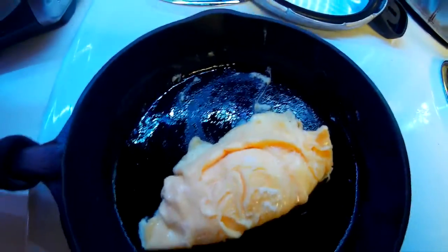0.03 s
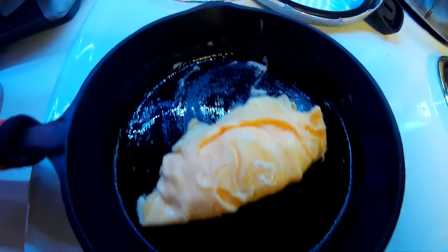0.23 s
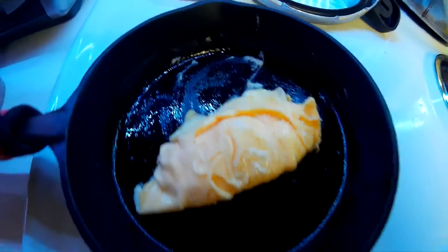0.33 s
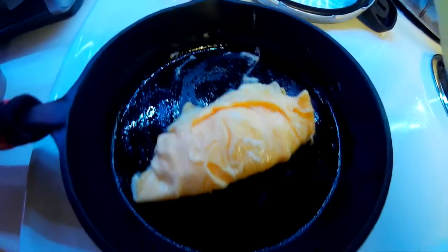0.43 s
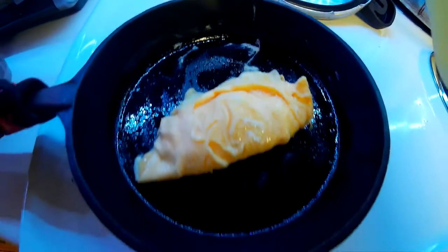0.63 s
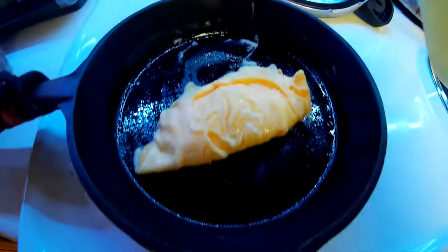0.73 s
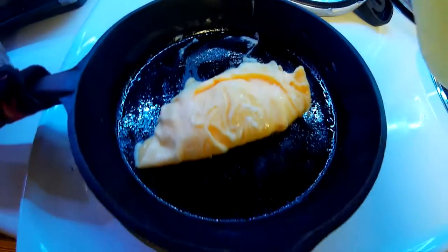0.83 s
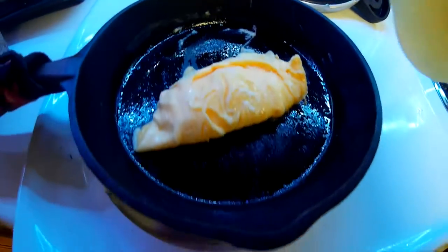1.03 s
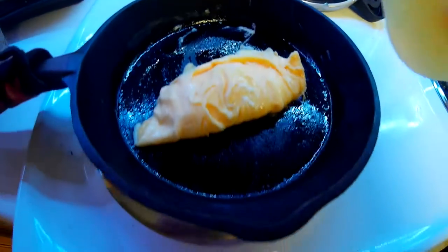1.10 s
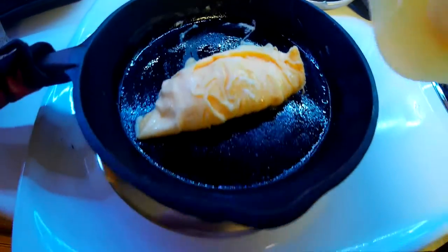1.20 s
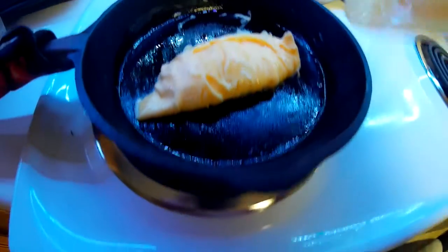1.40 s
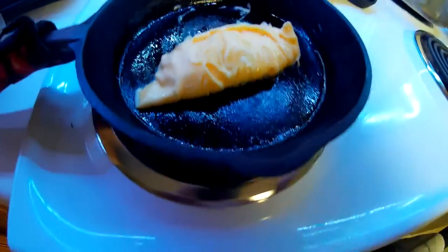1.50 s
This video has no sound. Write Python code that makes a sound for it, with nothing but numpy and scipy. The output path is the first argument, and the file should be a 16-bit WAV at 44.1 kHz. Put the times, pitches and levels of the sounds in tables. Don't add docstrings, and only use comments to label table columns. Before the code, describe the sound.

A cast iron pan shoved on a metal stove top: quiet hiss of hot fat, low hum and faint fan whine first, then from 0.17 s a creep swells into a dull, boomy, juddering thump with gritty scrape, strongest at 0.24-0.33 s with a sharp spit, fading by 0.56 s. Tiny crackles near 0.7 s, a faint brush around 0.85 s, then steady sizzle to 1.5 s.

```python
import sys
import numpy as np
from scipy import signal
from scipy.fft import rfft, irfft
from scipy.io import wavfile
from scipy.ndimage import uniform_filter1d

SR = 44100
rng = np.random.default_rng(int(sys.argv[2]) if len(sys.argv) > 2 else 0)


def waveform_to_disk(signal):
    frames = np.transpose(np.atleast_2d(signal))
    scaled = np.clip(frames, -1, 1) * 32767
    samples = np.round(scaled).astype(np.int16)
    wavfile.write(sys.argv[1], SR, samples)


def linear_from_db(decibels):
    return 10 ** (np.asarray(decibels, float) / 20)


N = 68355

# t/s, load on the burner level/dB, sliding speed level/dB, treble bite of the contact level/dB
SHOVE_MOTION = [
    (.165, -58, -74, -24),
    (.19, -47.5, -61, -7.5),
    (.232, -36, -51.5, -20),
    (.243, -31.5, -50.5, -5),
    (.275, -32.5, -43, -0.5),
    (.33, -33.5, -46, -2.5),
    (.43, -44.5, -47, -2.5),
    (.5, -49.5, -51, -8.5),
    (.56, -64, -69.5, 2),
]


def evened(x):
    return x / np.sqrt(np.mean(x ** 2) + 1e-20)


def along(table, column=1):
    rows = np.array(table)
    level_db = np.interp(np.arange(N) / SR, rows[:, 0], rows[:, column], -120, -120)
    return linear_from_db(level_db)


def resonate(x, hz, width):
    turn = np.exp(2j * np.pi * hz * np.arange(len(x)) / SR)
    r = np.exp(-np.pi * width / SR)
    return 2 * (turn * signal.lfilter([1 - r], [1, -r], x / turn)).real


def resonate_twice(x, hz, width):
    return resonate(resonate(x, hz, width), hz, width)


def band(x, low_hz, high_hz, order=2):
    return signal.sosfilt(signal.butter(order, [low_hz, high_hz], "bandpass", fs=SR, output="sos"), x)


def coloured(x, points):
    hz = np.fft.rfftfreq(len(x), 1 / SR)
    f, db = np.transpose(points)
    gain_db = np.interp(np.log(hz + 1), np.log(f + 1), db, -90)
    return irfft(rfft(x) * linear_from_db(gain_db), len(x))


def grains(per_s, spread_db):
    struck = rng.random(N) < per_s / SR
    size = linear_from_db(spread_db * np.minimum(rng.exponential(1, N), 4))
    return evened(struck * size * np.sign(rng.standard_normal(N)))


def patchy(depth_db, wide, long):
    z = signal.stft(rng.standard_normal(N + 512), nperseg=512, noverlap=384)[2]
    drift = uniform_filter1d(rng.standard_normal(z.shape), wide, axis=0)
    drift = uniform_filter1d(drift, long, axis=1)
    return signal.istft(z * linear_from_db(depth_db * evened(drift)), nperseg=512, noverlap=384)[1][:N]


def kitchen_hum():
    # f/Hz, spectrum level/dB
    hum_spectrum = [(16, -14), (28, 0), (46, -2), (70, -7), (150, -10), (280, -11), (600, -21), (2500, -62)]
    hum = linear_from_db(-53.5) * evened(coloured(patchy(0.23, wide=3, long=20), hum_spectrum))
    boom = linear_from_db(-64) * evened(resonate_twice(rng.standard_normal(N), hz=248, width=37))
    return hum + boom


def fan_whine():
    # f/Hz, bandwidth/Hz, level/dB
    fan_modes = [
        (2155, 220, -71.5),
        (2910, 450, -72),
    ]
    white = rng.standard_normal(N)
    return sum(linear_from_db(db) * evened(resonate_twice(white, hz, width)) for hz, width, db in fan_modes)


def fat_hiss():
    # f/Hz, spectrum level/dB
    hiss_spectrum = [(410, -46), (700, -5), (1190, -6), (2160, -5), (2560, -6), (3930, -7), (6270, -2),
                     (9130, -14), (15500, -21.5)]
    # t/s, level/dB
    simmer = [(0, .8), (.12, -1), (.55, -1.5), (.69, 1), (.75, -.5), (.85, .3), (1.0, -.7), (1.08, 1.2),
              (1.2, 0), (1.34, 1), (1.42, -.5), (1.55, -1)]
    fizz = patchy(1.0, wide=12, long=10) + linear_from_db(-9) * grains(1500, 3.0)
    return linear_from_db(-58.5) * evened(coloured(fizz, hiss_spectrum)) * along(simmer)


def spits():
    # t/s, peak level/dB
    spit_bursts = [
        (.018, -50),
        (.2618, -31),
        (.6675, -50),
        (.6915, -50),
        (.6928, -48),
        (.6942, -50),
        (.709, -48),
        (1.365, -54),
    ]
    clicks = np.zeros(N)
    for s, db in spit_bursts:
        clicks[round(s * SR)] = linear_from_db(db + 0.4)
    edge = band(clicks, 3500, 12300, order=10)
    ring = resonate_twice(edge, hz=6200, width=900)
    return clicks.max() * (ring / abs(ring).max() + linear_from_db(-1.5) * edge / abs(edge).max())


def flecks():
    # t/s, lower f/Hz, upper f/Hz, level/dB
    fleck_puffs = [
        (.138, 4200, 5700, -65),
        (.556, 6300, 9400, -67),
        (1.044, 5600, 6900, -62),
        (1.09, 5600, 6900, -63),
        (1.438, 5600, 6900, -65),
    ]
    fleck_s = .046
    t, out = np.arange(N) / SR, np.zeros(N)
    for s, low_hz, high_hz, db in fleck_puffs:
        puff = np.cos(np.pi * np.clip((t - s) / fleck_s, -.5, .5)) ** 2
        out += linear_from_db(db) * puff * evened(band(rng.standard_normal(N), low_hz, high_hz, order=8))
    return out


def panel(force):
    # f/Hz, bandwidth/Hz, level/dB
    panel_modes = [(117, 65, -11), (202, 22, -18), (238.5, 62, 4.5), (279, 20.5, -4), (318, 35, -10),
                   (411.8, 29, 0), (546, 58, -14.5), (627, 43, -13.5), (727, 110, -8.5), (850, 69, -16.5),
                   (1054, 33, -14.5), (1365, 21, -9.5), (1506, 32, -11), (1800, 36, -54)]
    return sum(linear_from_db(db) * resonate(force, hz, width) for hz, width, db in panel_modes)


def judder():
    slips = band(grains(per_s=2500, spread_db=1.5), 41, 1574, order=4)
    dull = signal.sosfiltfilt(signal.butter(2, 500, fs=SR, output="sos"), slips)
    bite = along(SHOVE_MOTION, column=3)
    force = (dull + (slips - dull) * bite) * along(SHOVE_MOTION)
    return linear_from_db(1) * panel(force) / np.std(panel(slips))


def heave():
    # t/s, level/dB
    frame_push = [
        (.17, -62),
        (.195, -47),
        (.232, -48),
        (.25, -41),
        (.32, -43),
        (.42, -55),
        (.51, -53),
        (.57, -62),
    ]
    low = band(rng.standard_normal(N), 29, 100)
    return linear_from_db(1.5) * evened(low) * along(frame_push)


def jolts():
    # t/s, force level/dB, contact time/ms
    catches = [(.2442, -23, 1.7), (.2485, -27, 1.7), (.2578, -23, 1.8), (.2655, -23, 1.5),
               (.2733, -20, 1.8), (.2772, -25, 1.4), (.2892, -30, 1.5), (.305, -25, 1.5), (.318, -24, 1.7),
               (.33, -28, 1.7), (.397, -33, 1.8), (.461, -33, 1.8)]
    t, force = np.arange(N) / SR, np.zeros(N)
    for s, db, ms in catches:
        force -= linear_from_db(db) * np.exp(-.5 * ((t - s) / (ms / 4000)) ** 2)
    force = signal.sosfiltfilt(signal.butter(2, 110, "highpass", fs=SR, output="sos"), force)
    return linear_from_db(5.5) * panel(force) + linear_from_db(-17) * force


def scrape():
    # f/Hz, spectrum level/dB
    rasp_spectrum = [(900, -40), (1600, -11), (2200, -6), (3500, -10), (4800, -8.5), (6300, -5.5),
                     (8000, -14.5), (11000, -23.5), (13000, -38)]
    grit = evened(coloured(grains(per_s=23000, spread_db=2), rasp_spectrum))
    return linear_from_db(-0.86) * grit * along(SHOVE_MOTION, column=2)


def glide():
    # t/s, level/dB
    brush_level = [
        (.72, -80),
        (.78, -65.5),
        (.85, -64),
        (.92, -65.5),
        (.97, -80),
    ]
    brush = evened(resonate_twice(rng.standard_normal(N), hz=1490, width=1550))
    return brush * along(brush_level)


def dropouts(x):
    gap_from_hz, gap_share, gap_db = 9000, .2, -30
    hz, _, z = signal.stft(x, SR, nperseg=2048, noverlap=1536)
    cells = rng.random((len(hz) // 6 + 1, z.shape[1] // 4 + 1))
    cells = cells.repeat(6, axis=0).repeat(4, axis=1)[:len(hz), :z.shape[1]]
    gone = (cells < gap_share) & (hz > gap_from_hz)[:, None]
    return signal.istft(z * np.where(gone, linear_from_db(gap_db), 1), SR, nperseg=2048, noverlap=1536)[1][:N]


def scene():
    background = kitchen_hum() + fan_whine() + fat_hiss() + spits()
    shove = judder() + heave() + jolts() + scrape() + glide()
    return np.tile(background + shove, (2, 1))


def low_pass(x):
    return signal.sosfilt(signal.butter(12, 15690, fs=SR, output="sos"), x)


def record(dry):
    bump = linear_from_db(-3) * resonate(dry[0], hz=6200, width=750)
    mic = dropouts(dry[0] + bump)
    return low_pass(mic + flecks() * np.array([[1], [-1]]))


dry = scene()
out = record(dry)
waveform_to_disk(out)
```